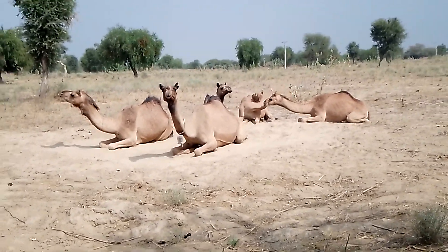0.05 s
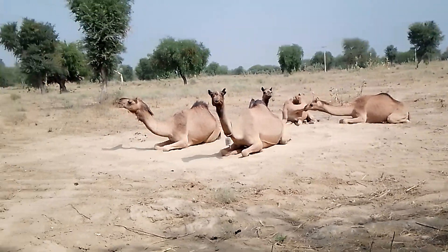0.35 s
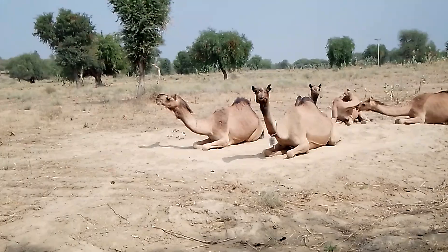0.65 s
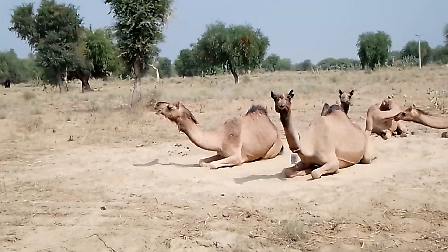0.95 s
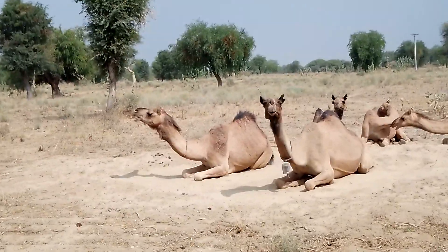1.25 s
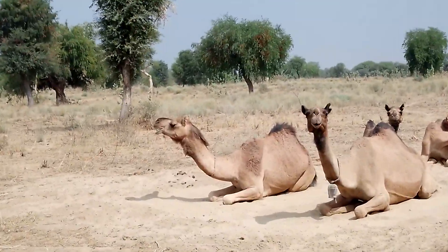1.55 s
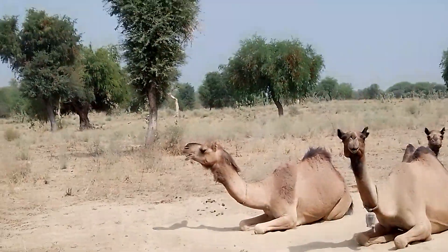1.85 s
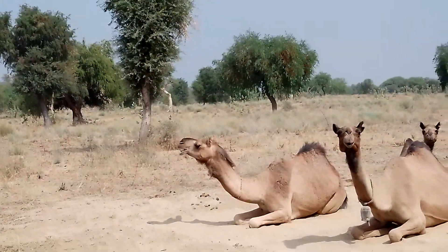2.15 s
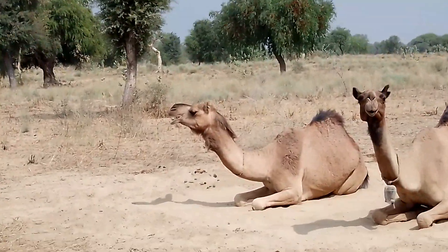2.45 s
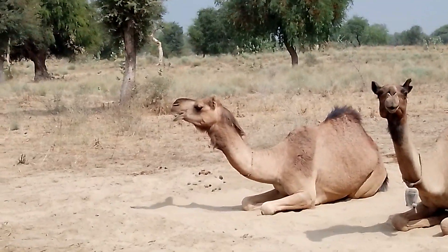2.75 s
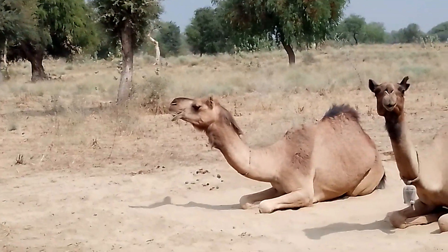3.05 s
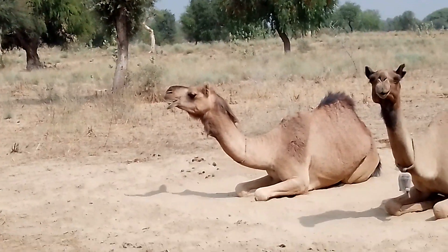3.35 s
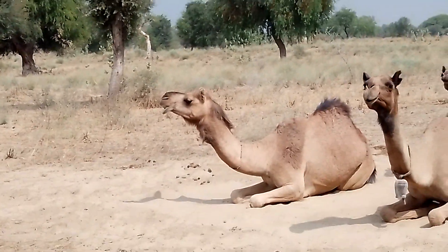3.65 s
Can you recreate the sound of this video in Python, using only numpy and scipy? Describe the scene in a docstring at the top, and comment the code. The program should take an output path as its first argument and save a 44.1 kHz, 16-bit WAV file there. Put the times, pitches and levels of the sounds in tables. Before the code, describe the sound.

One drawn-out camel groan sinks into a rough gurgle outdoors, with faint chirps and ticks.

```python
"""Camel groan on dry open ground

A resting camel groans once: a rasping start, a clear open-mouthed note, then the mouth closes on a
stumbling low gurgle that steadies and sinks away. Vocal-fold pulses ring the throat and mouth;
air hisses and spittle rasps with them. Small birds chirp far off; a few dry ticks, a sandy swish
and a soft bump sound nearby."""
import sys
import numpy as np
from scipy import signal
from scipy.fft import rfft, irfft
from scipy.io import wavfile
from scipy.ndimage import uniform_filter1d

SR = 44100
rng = np.random.default_rng(int(sys.argv[2]) if len(sys.argv) > 2 else 0)


def file_out(sig):
    """Save sig as 16-bit WAV at sys.argv[1]."""
    # one column per channel
    cols = np.atleast_2d(sig).T
    # limit, then scale
    lim = np.clip(cols, -1, 1)
    pcm = np.round(lim * 32767).astype(np.int16)
    wavfile.write(sys.argv[1], SR, pcm)


N = 171990
T = np.arange(N) / SR
RASP_DECAY_S = .0025

# vocal-fold irregularity before steadying: time_s, period_spread_ratio
ROUGHNESS = [(0, .004), (.12, .012), (.18, .11), (.27, .055), (.36, .025), (.45, .003), (.55, .003),
             (.7, .013), (1.22, .016), (1.35, .045), (1.6, .1), (2.1, .105), (2.6, .075), (3.05, .06),
             (3.25, .045), (3.5, .035), (3.58, .001), (3.8, .002)]
# deep throat tone: time_s, level_db
THROAT_LEVEL = [(0.0, -55.5), (0.17, -54.5), (0.29, -39.5), (0.38, -34), (0.69, -38.5), (1.27, -39),
                (1.32, -44.5), (1.39, -40.5), (1.7, -41), (1.74, -34.5), (1.79, -41), (1.84, -41),
                (1.94, -41), (1.96, -35.5), (1.995, -36), (2.02, -41.5), (2.1, -41), (2.14, -37.5),
                (2.255, -34.5), (2.29, -44.5), (2.4, -39.5), (2.44, -38), (2.51, -49.5), (2.54, -38),
                (2.6, -45), (2.67, -39.5), (2.79, -54), (2.82, -45.5), (2.85, -57), (2.94, -48.5),
                (3.15, -48), (3.26, -36), (3.29, -39), (3.33, -37.5), (3.4, -35.5), (3.417, -47),
                (3.44, -38), (3.66, -40), (3.72, -47.5), (3.82, -90)]
# mouth, 0 shut to 1 wide: time_s, opening
MOUTH_OPENING = [(0, 0.88), (.33, 0.78), (.55, 0.7), (.75, 0.54), (1.35, 0.41), (2.1, 0.12), (2.8, 0.15),
                 (3.8, 0.13)]


def from_db(db):
    """Decibels to gain."""
    return 10 ** (np.asarray(db) / 20)


def unit_rms(x):
    """Scale to RMS 1."""
    return x / np.sqrt(np.mean(x ** 2) + 1e-20)


def curves(rows):
    """One linearly interpolated curve per column after time_s."""
    time_s, *columns = np.transpose(rows)
    return [np.interp(T, time_s, column) for column in columns]


def levelled(x, samples):
    """Hold the running RMS at 1."""
    return x / np.sqrt(uniform_filter1d(uniform_filter1d(x * x, samples), samples) + 1e-14)


def noise(spectrum):
    """Unit-RMS coloured noise, rolled off beyond the spectrum's ends."""
    hz, db = np.transpose(spectrum)
    bin_hz = np.maximum(np.arange(N // 2 + 1) * SR / N, 1)
    colour = from_db(np.interp(np.log(bin_hz), np.log(hz), db))
    skirts = np.minimum(1, np.minimum(bin_hz / hz[0], hz[-1] / bin_hz)) ** 4
    return unit_rms(irfft(rfft(rng.standard_normal(N)) * colour * skirts, N))


def drift(rate_hz=16.4):
    """Slow random wander, unit RMS."""
    hop = 40
    r = np.exp(-2 * np.pi * rate_hz * hop / SR)
    slow = signal.lfilter([1], [1, -2 * r, r * r], rng.standard_normal(N // hop + 2002))[2000:]
    return np.interp(np.arange(N) / hop, np.arange(len(slow)), unit_rms(slow))


def resonate(x, hz, width_hz):
    """Two-pole resonance, unit peak gain."""
    r = np.exp(-np.pi * width_hz / SR)
    feedback = [1, -2 * r * np.cos(2 * np.pi * hz / SR), r * r]
    return signal.lfilter(np.array([1, 0, -1]) * (1 - r * r) / 2, feedback, x + 1e-18)


def decay(x, tau_s):
    """Give each click an exponential tail."""
    return signal.lfilter([1], [1, -np.exp(-1 / (tau_s * SR))], x + 1e-18)


def swell(peak_s, width_s):
    """Gaussian envelope."""
    return np.exp(-.5 * ((T - peak_s) / width_s) ** 2)


def delayed(x, lag_s):
    """Fractional delay."""
    return np.interp(T - lag_s, T, x, left=0)


def smear(x, delay_s, echo_gain):
    """All-pass echo: spreads a pulse in time, keeps its colour."""
    a = np.zeros(int(delay_s * SR) + 1)
    a[0], a[-1] = 1, -echo_gain
    return signal.lfilter(a[::-1], a, x + 1e-18)


def airy_tone(phase, width_hz):
    """Narrow noise band around a moving pitch."""
    lowpass = signal.butter(2, width_hz, fs=SR, output="sos")
    wander = unit_rms(signal.sosfilt(lowpass, rng.standard_normal((2, N))))
    return wander[0] * np.cos(phase) + wander[1] * np.sin(phase)


def still_air():
    """Faint, steady low noise."""
    spectrum = [(25, -15.5), (85, -3), (200, -0.5), (450, -15), (2100, -24), (3000, -47), (15000, -42)]  # freq_hz, relative_db
    return from_db(-74) * noise(spectrum)


def birds():
    """Chirps glide, linger loudest at mid pitch, glide on; pitch and level quiver together."""
    # positive sweep falls: start_s, length_s, middle_hz, half_sweep_hz, level_db
    chirps = [(0.097, 0.033, 3170, 452, -68), (0.27, 0.043, 2820, 354, -62),
              (0.431, 0.035, 2400, -200, -52), (.492, .02, 2820, 399, -62.5),
              (0.57, 0.037, 2920, 898, -61.5), (2.197, 0.049, 3590, 698, -77.5),
              (2.26, 0.067, 4400, 1100, -73.5), (2.588, 0.046, 2760, 402, -69.5),
              (2.7, 0.024, 3635, 594, -77), (2.81, 0.027, 3200, 500, -79), (2.898, 0.043, 3060, 545, -66),
              (3.737, 0.081, 2130, -100, -72.5)]
    linear_share, quiver_hz, quiver_db = .067, 70, 3
    out, quiver = np.zeros(N), drift(rate_hz=90)
    for start_s, length_s, middle_hz, half_sweep_hz, level_db in chirps:
        now = (T >= start_s) & (T < start_s + length_s)
        ramp = np.linspace(1, -1, now.sum())
        glide = linear_share * ramp + (1 - linear_share) * ramp ** 3
        hz = middle_hz + half_sweep_hz * glide + quiver_hz * quiver[now]
        envelope = from_db(level_db + quiver_db * quiver[now]) * np.cos(np.pi * ramp / 2) ** 2
        out[now] += envelope * np.sin(2 * np.pi * np.cumsum(hz) / SR)
    return out


def bump():
    """A soft low bump at the end."""
    spectrum = [(60, -9), (150, -22), (280, 8), (600, -35)]  # freq_hz, relative_db
    return from_db(-67.5) * swell(peak_s=3.877, width_s=.011) * noise(spectrum)


def swish():
    """A brief sandy swish."""
    spectrum = [(1760, -42), (3000, -5), (3720, -2), (6540, -9), (8510, 9), (9710, -1), (12500, 9),
                (15800, -4)]  # freq_hz, relative_db
    return from_db(-55) * swell(peak_s=.905, width_s=.037) * noise(spectrum)


def ticks():
    """Dry ticks, each the mean of a bright snap and a duller knock."""
    hits = [(0.032, -43, -51.5), (1.187, -43, -71), (1.238, -45.5, -70), (1.267, -51, -76),
            (1.437, -47, -69), (1.509, -37.5, -50), (1.516, -46, -65), (1.794, -49, -49), (2.451, -55, -67),
            (3.108, -43.5, -55)]  # start_s, snap_db, knock_db
    snap_spectrum = [(5500, -45), (8500, 12), (16000, 2.5)]  # freq_hz, relative_db
    knock_spectrum = [(1500, -4), (4000, 11), (8000, -6)]  # freq_hz, relative_db
    tau_s = .0006
    snaps, knocks = np.zeros((2, N))
    for start_s, snap_db, knock_db in hits:
        i = int(start_s * SR)
        snaps[i], knocks[i] = from_db([snap_db, knock_db])
    snaps = decay(snaps, tau_s) * levelled(noise(snap_spectrum), samples=24)
    knocks = decay(knocks, tau_s) * levelled(noise(knock_spectrum), samples=24)
    return (snaps + knocks) / 2


def rumble():
    """Low flutter that partly follows the throat tone's level."""
    spectrum = [(25, -30.5), (55, -27.5), (115, 4), (200, -33)]  # freq_hz, relative_db
    throat_db, = curves(THROAT_LEVEL)
    return from_db(-74 + .62 * (throat_db - np.median(throat_db))) * noise(spectrum)


def hiss(pulses):
    """Air hiss and a thin whistle with a weaker octave below; all throb with the folds."""
    hiss_level = [(0, -76.5), (.4, -76), (.65, -70), (1.1, -71), (1.55, -71), (1.95, -74.5), (2.2, -70.5),
                  (2.55, -76), (3.3, -76.5), (3.7, -77), (3.9, -82)]  # time_s, level_db
    spectrum = [(3100, -5.5), (3700, -1), (5600, -6), (6700, -6), (7400, 3.5), (11500, 1), (15800, 2)]  # freq_hz, relative_db
    whistle_path = [(.1, 8400, -100.5), (.42, 8170, -75), (.68, 7920, -75), (.95, 7900, -105)]  # time_s, pitch_hz, level_db
    hiss_db, = curves(hiss_level)
    whistle_hz, whistle_db = curves(whistle_path)
    throb = unit_rms(1 + .38 * unit_rms(decay(pulses, RASP_DECAY_S)))
    phase = 2 * np.pi * np.cumsum(whistle_hz) / SR
    whistle = airy_tone(phase, width_hz=54) + from_db(-6.5) * airy_tone(phase / 2, width_hz=27)
    return throb * (from_db(hiss_db) * noise(spectrum) + from_db(whistle_db) * whistle)


def spittle(pulses):
    """Pulses spatter with varying force and ring narrow wet-mouth resonances that come and go."""
    resonances = [(3700, -84, 1, 0.67), (7020, -79.5, 1.0, 0.36), (7450, -83, 1.7, 0.78),
                  (7950, -79.5, 1.4, 0.43), (8360, -79, .75, 0.25), (9558, -76, 1.55, 0.13),
                  (10500, -88.5, 1.55, .3), (11835, -84, 1.7, .17)]  # freq_hz, level_db, peak_s, width_s
    width_hz, force_spread_db = 170, 4
    force = from_db(force_spread_db * np.clip(drift(rate_hz=60), -2, 2))
    spatter = decay(pulses * force, RASP_DECAY_S)
    out = np.zeros(N)
    for hz, level_db, peak_s, width_s in resonances:
        ring = resonate(spatter * rng.standard_normal(N), hz, width_hz)
        ring = unit_rms(resonate(ring, hz, width_hz))
        out += from_db(level_db) * swell(peak_s, width_s) * ring
    return out


def fold_pulses():
    """Folds slap shut once a period, jittered by roughness. Returns even- and uneven-force pulses."""
    pitch = [(0, 111.8), (.14, 111.3), (.28, 116.3), (.4, 114), (.52, 115.9), (.72, 113), (.89, 114.4),
             (.97, 111.3), (1.05, 116), (1.18, 110.7), (1.22, 113.8), (1.26, 109.6), (1.5, 108.4),
             (1.8, 116.8), (2.3, 122.2), (2.7, 124.4), (3.55, 125.1), (3.67, 123.5), (3.72, 119),
             (3.78, 110)]  # time_s, pitch_hz
    pitch_hz, = curves(pitch)
    roughness, = curves(ROUGHNESS)
    throat_db, = curves(THROAT_LEVEL)
    jitter = roughness * np.interp(throat_db, (-41, -36), [1, .35])  # a strong tone steadies the beat
    shimmer_db = 1 + 30 * roughness
    even, uneven, position = np.zeros(N), np.zeros(N), 0.
    for late, strong in np.clip(rng.standard_normal((N // 200, 2)), -2, 2):
        i = int(position)
        if i >= N - 1:
            break
        even[i:i + 2] = 1 - (position - i), position - i
        uneven[i:i + 2] = even[i:i + 2] * from_db(strong * shimmer_db[i])
        position += SR / pitch_hz[i] * (1 + jitter[i] * late)
    return even, uneven


def tract(source, formants, band_hz, waver_db=2.13):
    """Resonances at unit level overall; each follows the mouth opening and wavers on its own."""
    opening, = curves(MOUTH_OPENING)
    out = np.zeros(N)
    for k, (hz, width_hz, *gains_db) in enumerate(formants):
        gain = from_db(np.interp(opening, [0, .5, 1], gains_db) + waver_db * drift())
        out += (-1) ** k * gain * resonate(source, hz, width_hz)
    bandpass = signal.butter(4, band_hz, "band", fs=SR, output="sos")
    return levelled(signal.sosfilt(bandpass, out), samples=1200)


def throat_tone(airflow):
    """Air pulses ring the deep throat resonances."""
    resonances = [(221.9, 40, -44.5, -4, -6.5), (260.2, 39.4, -3.5, 4.5, -3), (296.8, 50.7, -11, -2, -8.5),
                  (343, 78, -42.5, -8, -22.5)]  # freq_hz, width_hz, shut_db, half_open_db, wide_open_db
    waver_db = 1.23
    level_db, = curves(THROAT_LEVEL)
    gain = from_db(level_db + waver_db * drift())
    return gain * tract(airflow, resonances, band_hz=(189, 339), waver_db=waver_db)


def mouth_tone(slaps):
    """Fold slaps bounce along the neck, smear further in an open mouth and ring three formant groups."""
    # formants: freq_hz, width_hz, shut_db, half_open_db, wide_open_db
    low_formants = [(563.3, 48.5, 10.5, -8, -20), (625, 14.5, 6, -8.5, 13.5), (639, 75, -38, -8, -3.5),
                    (815, 55, 1, -10.5, -13.5)]
    middle_formants = [(1029, 106, -0.5, -5, -3.5), (1257, 179, -2.5, 0, -10.5), (1446, 155, 1, 1.5, -19)]
    high_formants = [(1682, 37, -23.5, 5.5, -10.5), (2006, 157, -13.5, -16, 11.5),
                     (2350, 85, -8.5, -5.5, -23), (2651, 84, -4.5, -11, -26)]
    group_levels = [(0.0, -46, -65, -65), (0.03, -75, -55.5, -70.5), (0.14, -59.5, -51.5, -57.5),
                    (0.17, -70, -58.5, -74), (0.19, -56, -54, -62.5), (0.51, -49, -45.5, -48.5),
                    (0.62, -48.5, -46.5, -53), (0.88, -48, -49, -56.5), (1.08, -46.5, -53, -60),
                    (1.11, -45, -50.5, -55.5), (1.29, -49, -51, -59), (1.36, -60, -55.5, -65),
                    (1.69, -61.5, -66, -72.5), (2.32, -65, -68.5, -71), (2.39, -64, -70, -74.5),
                    (3.52, -70, -70.5, -75.5), (3.71, -61.5, -68, -77.5), (3.81, -112, -112, -112)]  # time_s, low_db, middle_db, high_db
    opening, = curves(MOUTH_OPENING)
    ringing = np.interp(opening, (.456, .472), [0, 1])
    neck = smear(slaps, delay_s=.0021, echo_gain=.36)
    mouth = neck * (1 - ringing) + smear(neck * ringing, delay_s=.0033, echo_gain=.49)
    low = tract(delayed(mouth, lag_s=.00369), low_formants, band_hz=(486.4, 878))
    middle = tract(mouth, middle_formants, band_hz=(843, 1405))
    high = tract(delayed(mouth, lag_s=.00087), high_formants, band_hz=(1679, 2440))
    low_db, middle_db, high_db = curves(group_levels)
    return from_db(low_db) * low + from_db(middle_db) * middle + from_db(high_db) * high


def groan(even, uneven):
    """Even air pulses drive the throat, uneven slaps the mouth; turbulence adds rasp to both."""
    roughness, = curves(ROUGHNESS)
    rasp_db = np.interp(roughness, [0, .016], [-13, -3])
    rasp = unit_rms(decay(uneven, RASP_DECAY_S) * rng.standard_normal(N))
    airflow = unit_rms(even) + from_db(-14) * rasp
    slaps = unit_rms(uneven) + from_db(rasp_db) * rasp
    return throat_tone(airflow) + mouth_tone(slaps) + rumble()


def outdoors(x, scatter_db=-17, t60_s=.2):
    """Direct sound plus a weak, short scatter."""
    t = T[:SR // 2]
    tail = rng.standard_normal(len(t)) * from_db(-60 * t / t60_s)
    return x + from_db(scatter_db) * signal.fftconvolve(x, tail / np.linalg.norm(tail))[:N]


def scene():
    """Camel, birds and small nearby sounds over still air; mono."""
    even, uneven = fold_pulses()
    nearby = ticks() + swish() + bump()
    voices = outdoors(groan(even, uneven) + birds())
    return (voices + hiss(uneven) + spittle(uneven) + nearby + still_air())[None]


def record(dry):
    """Steep low-pass."""
    cutoff_hz = 15900
    return signal.sosfilt(signal.ellip(10, .2, 70, cutoff_hz, fs=SR, output="sos"), dry)


dry = scene()
out = record(dry)
file_out(out)
```